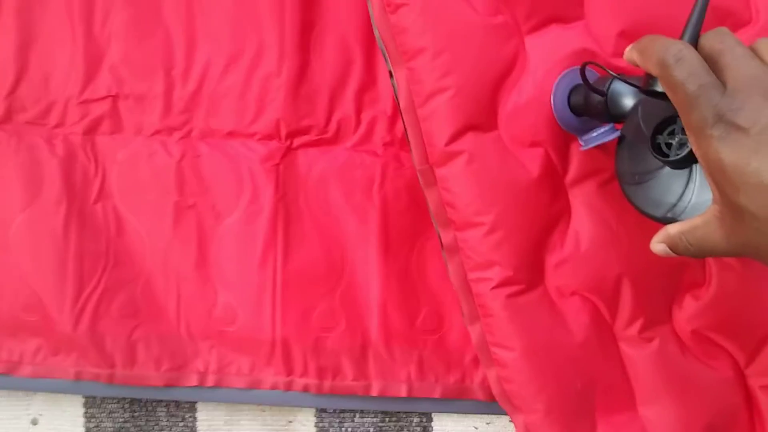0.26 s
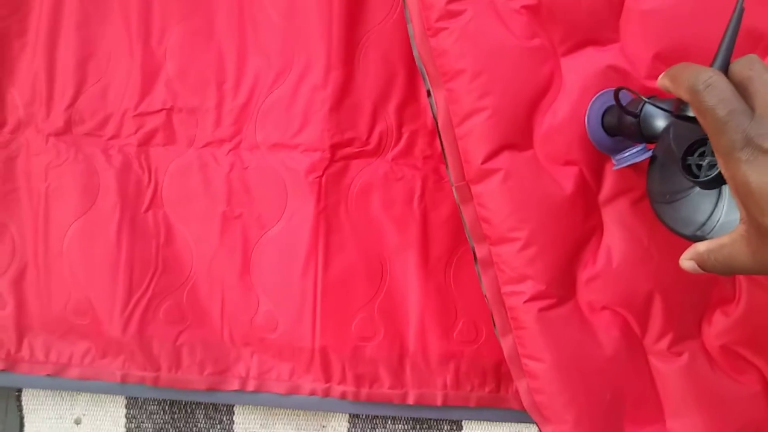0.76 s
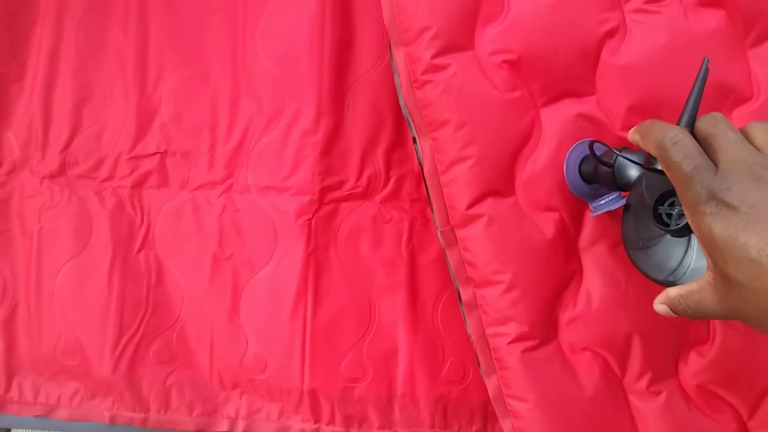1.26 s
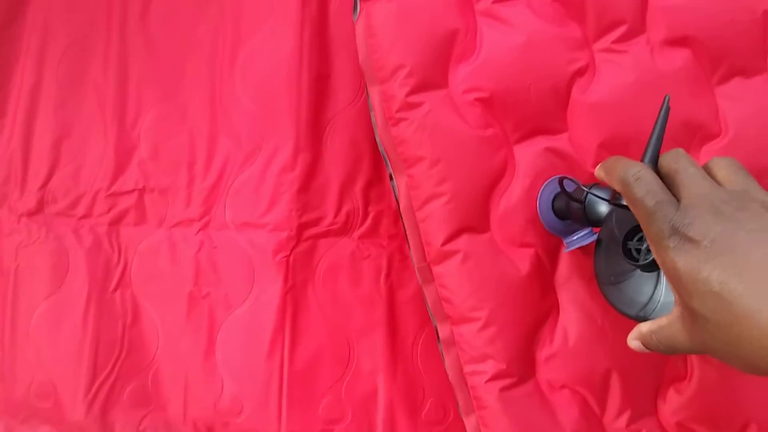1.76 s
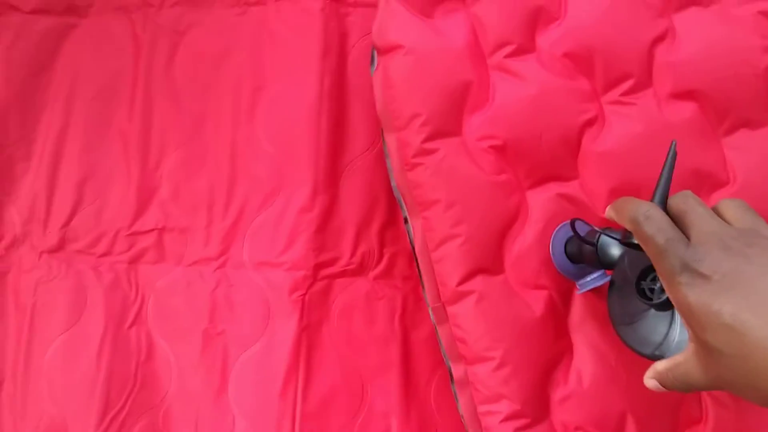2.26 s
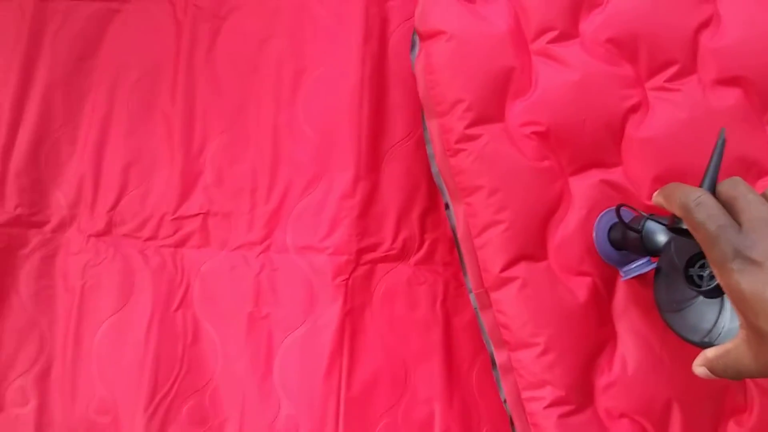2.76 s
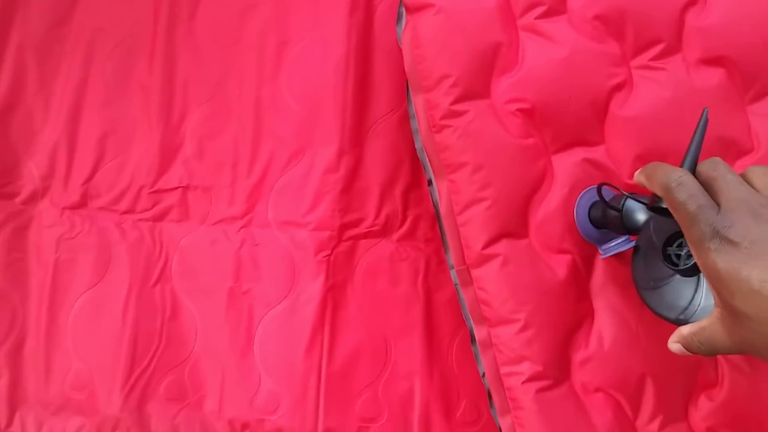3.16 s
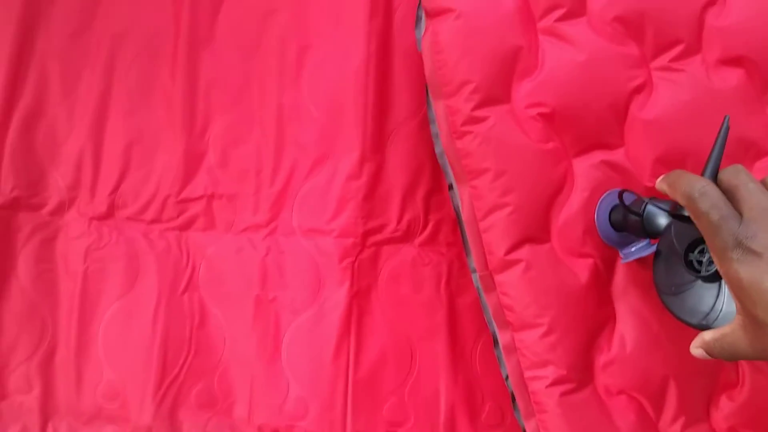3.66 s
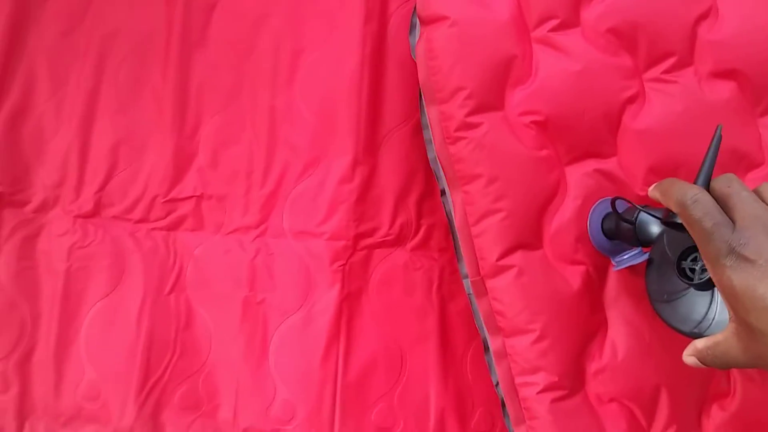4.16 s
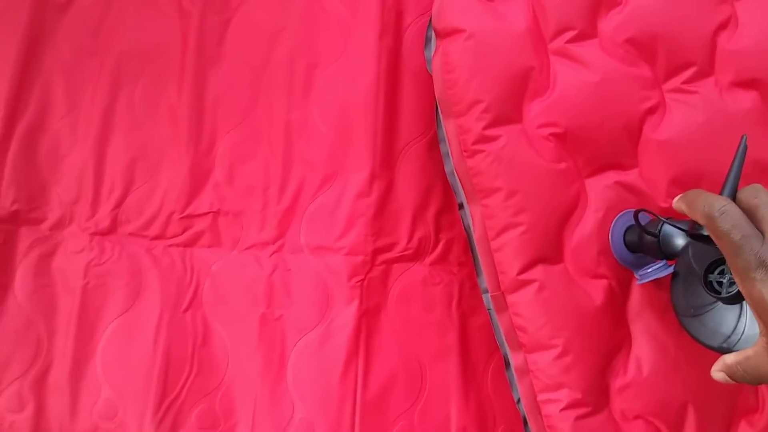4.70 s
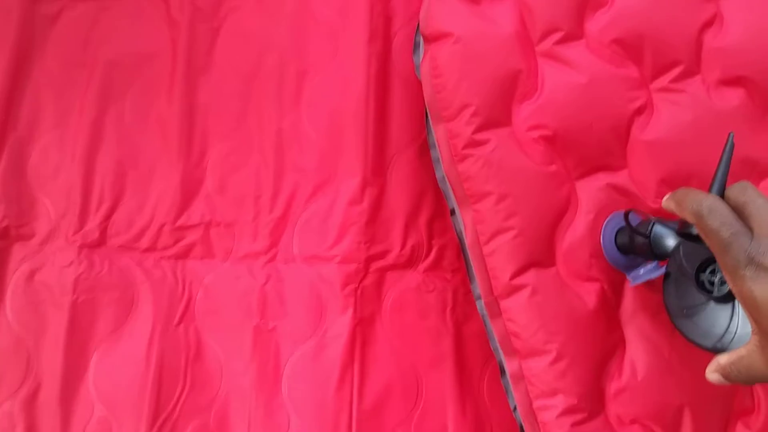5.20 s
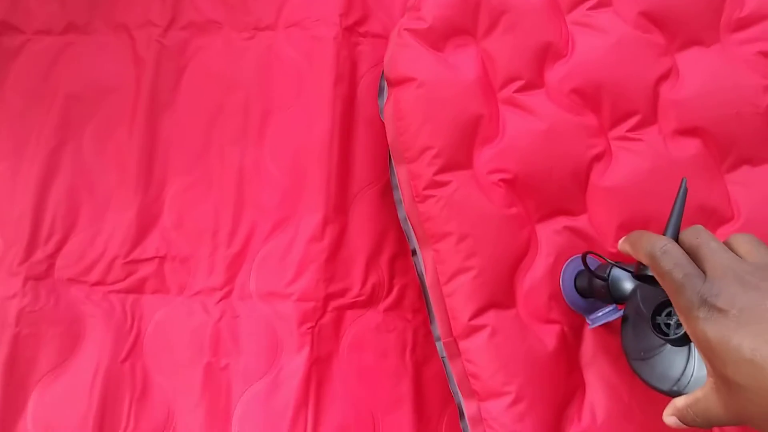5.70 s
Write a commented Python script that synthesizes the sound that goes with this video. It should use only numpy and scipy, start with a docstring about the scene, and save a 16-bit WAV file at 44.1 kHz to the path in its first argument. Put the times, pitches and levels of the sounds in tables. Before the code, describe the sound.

Close and dry: an electric inflator drones without a break, mixing a hard tonal whir, a high whine and bright turbulent airflow. Individual tones waver as the hand shifts, while the overall loudness stays nearly constant. Speed settles a touch lower over the first few seconds. Just before the end the hand softly knocks the mat, barely audible under the motor.

```python
"""A handheld electric pump runs steadily, close by, blowing into the valve of an inflatable camping mat.
Its rotor, sagging slightly in speed, sings on multiples of the turn rate: sums of shaft-locked sines.
The strongest tones swell and fade as the hand shifts; a thin brush buzz lies on the highest multiples.
Turbulent air rushes: noise chopped once a turn, its broad colour broken by peaks and dips.
Near the end the hand bumps the mat softly: one damped low sine."""
import sys
import numpy as np
from scipy import signal
from scipy.fft import rfft, irfft, next_fast_len
from scipy.io import wavfile
from scipy.ndimage import map_coordinates

SR = 44100
rng = np.random.default_rng(int(sys.argv[2]) if len(sys.argv) > 2 else 0)


def unload_audio(sound):
    """Save the sound as a 16-bit wav file, at the path given as the first command line argument."""
    columns = np.transpose(np.atleast_2d(sound))
    # keep every value between -1 and 1, then stretch to whole-number steps
    steps = np.round(np.clip(columns, -1, 1) * 32767)
    wavfile.write(sys.argv[1], SR, steps.astype(np.int16))


N = 261954

# rotor speed: (time [s], turn rate [Hz])
SPEED_HZ = [(0.05, 228.6), (.4, 229.95), (.75, 229.15), (1.05, 228.3), (1.75, 226.05), (2.2, 225.2),
            (3.25, 224.5), (5.9, 224.5)]
# leading tones, as multiples of the turn rate [1]: (low, blade, motor, upper, whine)
LEADING_MULTIPLES = (4, 7, 13, 16, 26)


def amp(db):
    """Decibels to gain."""
    return 10 ** (np.asarray(db) / 20)


def unit(x):
    """Scale to rms 1."""
    return x / np.sqrt(np.mean(x ** 2) + 1e-20)


def along(points, hz):
    """Read (Hz, value) points on a log frequency axis."""
    f, v = np.transpose(points)
    return np.interp(np.log(hz + 1), np.log(f + 1), v)


def curves(rows):
    """One value per sample for each column after the time."""
    s, *cols = np.transpose(rows)
    return [np.interp(np.arange(N) / SR, s, c) for c in cols]


def wobble(knots_per_s, size=2048):
    """Smooth random curve through normal knots."""
    at = np.linspace(0, N, size)
    knots = rng.standard_normal(size)
    curve = map_coordinates(knots, [at * knots_per_s / SR], mode="wrap")
    return np.interp(np.arange(N), at, curve)


def filtered(x, response):
    """Multiply the spectrum of x by a response of frequency."""
    m = next_fast_len(N + SR // 2)
    spectrum = rfft(x, m) * response(np.fft.rfftfreq(m, 1 / SR))
    return irfft(spectrum, m)[..., :N]


def rotor_angle(jitter_hz):
    """Shaft angle in radians: integrated turn rate, which trembles under load."""
    turn_hz, = curves(SPEED_HZ)
    return 2 * np.pi * np.cumsum(turn_hz + jitter_hz * wobble(25.34)) / SR


def settled():
    """Share, 0-1 per sample, to which the pump has settled into its seat on the valve."""
    # (time [s], share [0-1])
    seat_share = [(0, 0), (.95, 0.28), (1.9, 0.93), (5.94, 1)]
    return np.clip(curves(seat_share)[0], 0, 1)


def partial(angle, multiple, flutter, wander_rad=0.51):
    """Shaft-locked tone, rms about 1: turbulence shakes it, its phase wanders as the pump moves."""
    phase = multiple * angle + rng.uniform(0, 2 * np.pi) + wander_rad * wobble(1)
    in_phase = (1 + flutter * wobble(30)) * np.sin(phase)
    quadrature = flutter * wobble(30) * np.cos(phase)
    return np.sqrt(2) * (in_phase + quadrature)


def leading_tones(angle, blade_flutter, motor_flutter):
    """Two impeller and three steadier motor tones; reflections cut narrow dips between broad swells."""
    # level of the low impeller tone: (time [s], level [dB rms])
    low_db = [(0, -35.5), (1.25, -35.5), (2.1, -40), (3.1, -39.5), (3.6, -36), (5.9, -37.5)]
    # level of the blade tone: (time [s], level [dB rms])
    blade_db = [(0.65, -33), (1.3, -25.5), (1.85, -34), (2.55, -28), (5.85, -28)]
    # level of the motor tone: (time [s], level [dB rms])
    motor_db = [(0.35, -45), (0.72, -56), (1.1, -41), (1.7, -49), (2.05, -38), (3, -40), (3.4, -49),
                (3.95, -52), (4.3, -38.2), (4.95, -38), (5.35, -44.5), (5.85, -38.5)]
    # level of the upper motor tone: (time [s], level [dB rms])
    upper_db = [(0.3, -43), (1.9, -48), (2.65, -42), (3.9, -47), (4.6, -63), (5.2, -47.5)]
    # level of the piercing whine: (time [s], level [dB rms])
    whine_db = [(0, -49), (0.45, -39.5), (0.85, -53), (1.1, -40), (1.65, -33.5), (2.05, -46), (2.6, -34),
                (3.2, -37), (4.7, -33.5), (5.85, -36.3)]
    levels = low_db, blade_db, motor_db, upper_db, whine_db
    flutters = blade_flutter, blade_flutter, motor_flutter, motor_flutter, motor_flutter
    out = np.zeros(N)
    for multiple, level_db, flutter in zip(LEADING_MULTIPLES, levels, flutters):
        gain, = curves([(s, amp(db)) for s, db in level_db])
        out += gain * partial(angle, multiple, flutter, wander_rad=0.28)
    return out


def whir(angle, drift_db, flutter, rough_flutter, rough_multiple=8):
    """Other multiples rebalance as the pump settles; short waves drift most, turbulence smears the 8th."""
    # tones from unbalance, uneven blades and commutator:
    # (multiple [1], level at first [dB rms], level once settled [dB rms]), before drift
    weak_tones = [(1, -56.5, -57.3), (2, -61.2, -58.8), (3, -50.3, -56.1), (5, -50.4, -52.1),
                  (6, -37.3, -34.9), (8, -37, -45), (9, -54.2, -51.2), (10, -61.4, -61.3),
                  (11, -55.3, -62.7), (12, -51.1, -49.3), (14, -49.2, -50.2), (15, -49.1, -48.3),
                  (17, -42.5, -50), (18, -60.2, -63.4), (19, -50.1, -51), (20, -53.9, -56.4),
                  (21, -53.5, -53.5), (22, -53.7, -55.7), (23, -58.7, -55.2), (24, -55.7, -56.2),
                  (25, -51.3, -60.2), (27, -62.6, -63.7), (33, -59, -74), (34, -66.4, -72.3),
                  (39, -64.5, -74.6), (44, -79, -76), (56, -81, -79), (65, -83, -80)]
    out, share = np.zeros(N), settled()
    for k, first_db, settled_db in weak_tones:
        drift = drift_db * min(k / 10, 1) * wobble(1.74)
        shake = flutter + rough_flutter / (1 + (2 * (k - rough_multiple)) ** 2)
        level_db = first_db + share * (settled_db - first_db) + drift
        out += amp(level_db) * unit(partial(angle, k, shake))
    return out


def brushes(angle, drift_db, end_multiple=70):
    """Thin comb of high multiples from the brushes, each fading in and out by itself."""
    # (frequency [Hz], level of each tone before drift [dB rms])
    buzz_db = [(6300, -72), (7050, -91), (7600, -73.5), (8200, -74), (8900, -77), (9450, -90), (10100, -82),
               (12000, -81), (15500, -88)]
    turn_hz = np.mean(curves(SPEED_HZ))
    comb = np.zeros(N)
    for k in range(LEADING_MULTIPLES[-1] + 2, end_multiple):
        level_db = along(buzz_db, k * turn_hz) + drift_db * wobble(1.52)
        comb += amp(level_db) * np.sin(k * angle + rng.uniform(0, 2 * np.pi))
    return np.sqrt(2) * comb


def air(angle, level_db, chop, gust_db, sway_db, roar_hz, hiss_hz):
    """Turbulence chopped once a turn and coloured; three bands ease and sway separately."""
    # level offsets of nozzle roar, impeller rush, leak hiss: (at first [dB], once settled [dB])
    ease_db = [(0.1, -0.73), (1.2, -0.2), (1, -0.8)]
    turbulence = rng.standard_normal(N) * (1 + chop * np.cos(angle))
    whole = unit(hand_ripple(filtered(turbulence, air_colour)))
    roar = filtered(whole, lambda hz: 1 / (1 + (hz / roar_hz) ** 10))
    hiss = filtered(whole, lambda hz: 1 - 1 / (1 + (hz / hiss_hz) ** 10))
    rush = whole - roar - hiss
    out, share = np.zeros(N), settled()
    for (first_db, settled_db), layer in zip(ease_db, (roar, rush, hiss)):
        flow_db = first_db + share * (settled_db - first_db)
        out += amp(level_db + flow_db + sway_db * wobble(1.48) + gust_db * wobble(20)) * layer
    return out


def air_colour(hz, echo=0.1, ripple_hz=140.1):
    """Gain of the air noise: broad colour with peaks and dips, rippled by a short inverted echo."""
    # broad colour of the air noise: (frequency [Hz], relative density [dB])
    broad_db = [(120, -60.7), (190, -44), (260, -23), (550, -13), (1150, -10.5), (1750, -0.5), (2400, -16),
                (4000, -21), (5800, -18), (6700, -31), (7600, -36.5), (9000, -36), (12000, -48.5),
                (15500, -48.4)]
    # peaks (+) and dips (-) in the colour of the air noise: (centre [Hz], width [Hz], height [dB])
    peaks_and_dips = [(601, 120, 8.0), (840, 293, 6.5), (1024, 22, 7), (1415, 40, -2.5), (1549, 69, 4),
                      (1673, 19.5, 5.5), (1990, 260, 3.5), (2470, 87, -1.5), (2586, 210, 7.5),
                      (3070, 136, -7), (3200, 150, 7.5), (3390, 153, 12), (3730, 100, 3.5),
                      (4060, 110, 0.5), (4335, 170, 7.5), (4780, 200, 4), (5100, 118, -2), (5280, 70, -5),
                      (7170, 230, -25), (9430, 270, -14.3)]
    detail_db = sum(db / (1 + (2 * (hz - centre) / width) ** 2) for centre, width, db in peaks_and_dips)
    return amp(along(broad_db, hz) + detail_db) * (1 - echo * np.exp(-2j * np.pi * hz / ripple_hz))


def hand_ripple(x, spacing_hz=1406, depth_db=2.5, size=1024):
    """A brief shift of the hand: its reflection lays a comb-like ripple on the spectrum."""
    # (time [s], share of the ripple [0-1])
    tilt_share = [(0, 0), (3.1, 0), (3.4, 1), (3.95, 0.9), (4.2, 0), (5.94, 0.13)]
    hz, t, z = signal.stft(x, SR, nperseg=size)
    share = np.interp(t, *np.transpose(tilt_share))
    ripple_db = -depth_db * np.outer(np.cos(2 * np.pi * hz / spacing_hz), share)
    reach = np.minimum(hz / 3000, 1)  # long waves hardly notice the hand
    return signal.istft(z * amp(reach[:, None] * ripple_db), SR, nperseg=size)[1][:N]


def bump(start_s=5.76, rise_s=0.012):
    """The hand bumps the mat: one dull, quickly damped sine."""
    # (pitch [Hz], strength before rise and decay [dB], time to fall 60 dB [s])
    hz, db, t60_s = (177, -39, 0.065)
    t = np.maximum(np.arange(N) / SR - start_s, 0)
    envelope = np.exp(-np.log(1000) * t / t60_s) * (1 - np.exp(-t / rise_s)) ** 2
    return amp(db) * envelope * np.sin(2 * np.pi * hz * t)


def scene():
    """Tones and air noise share one shaft; the bump is added."""
    angle = rotor_angle(jitter_hz=0.026)
    leading = leading_tones(angle, blade_flutter=0.058, motor_flutter=0.041)
    others = whir(angle, drift_db=2.5, flutter=0.057, rough_flutter=0.48)
    buzz = brushes(angle, drift_db=2.5)
    rushing = air(angle, level_db=-29.5, chop=0.12, gust_db=0.25, sway_db=0.3, roar_hz=1200, hiss_hz=4000)
    return (leading + others + buzz + rushing + bump())[None]


def record(dry, fade_s=0.004, top_hz=15720):
    """Fade in without a click; cut everything above the band limit."""
    opening = np.minimum(np.arange(N) / SR / fade_s, 1)
    return filtered(dry * opening, lambda hz: hz < top_hz)


dry = scene()
out = record(dry)
unload_audio(out)
```